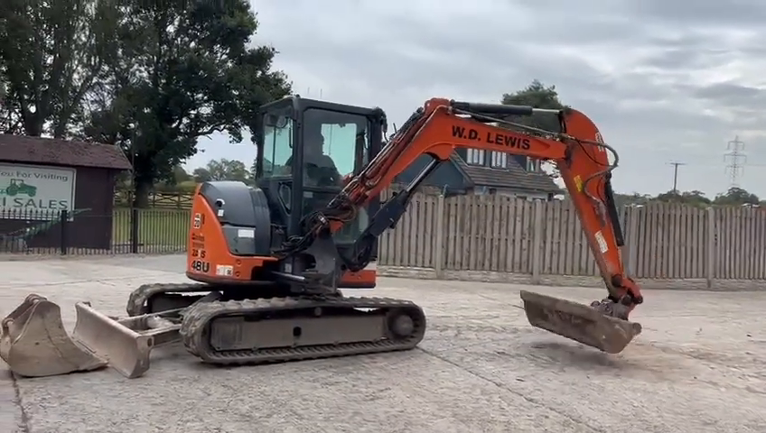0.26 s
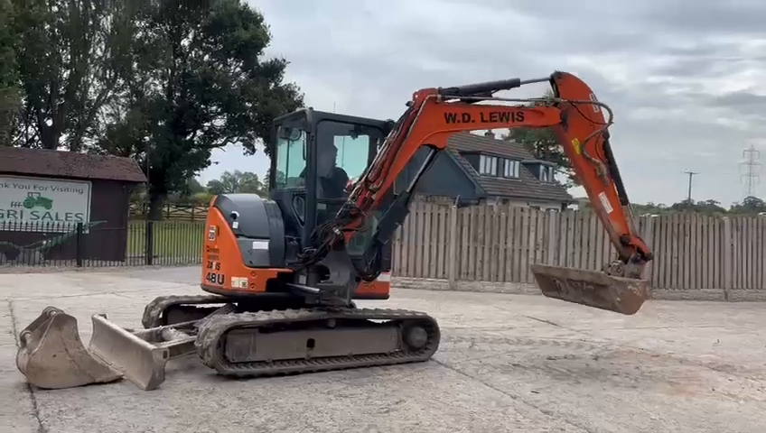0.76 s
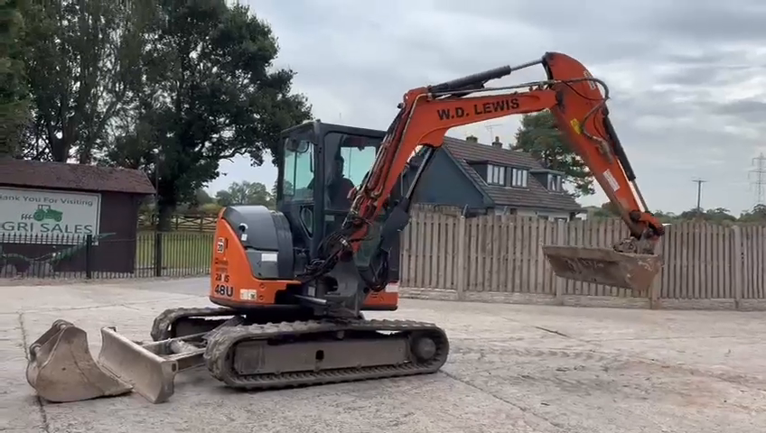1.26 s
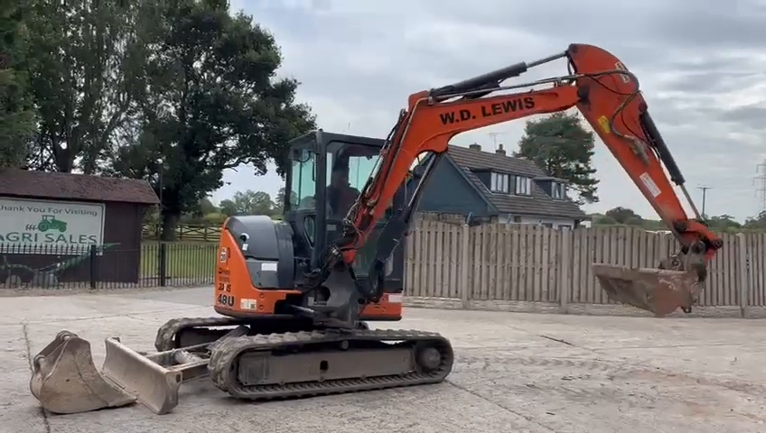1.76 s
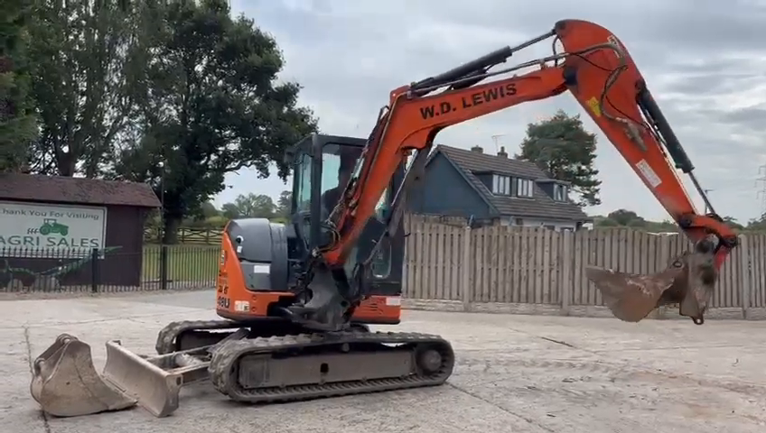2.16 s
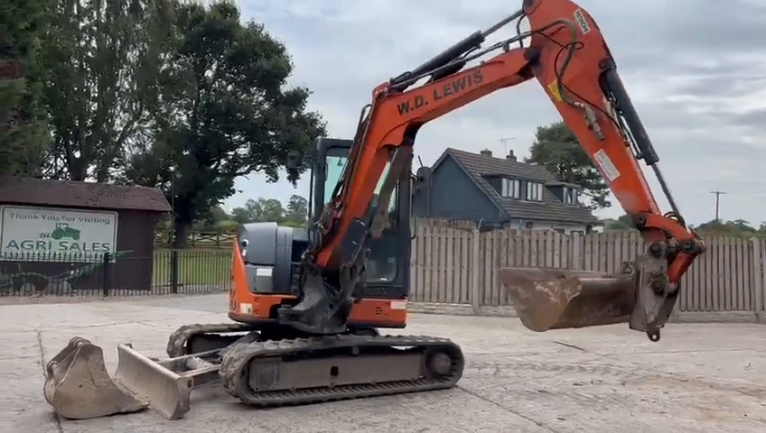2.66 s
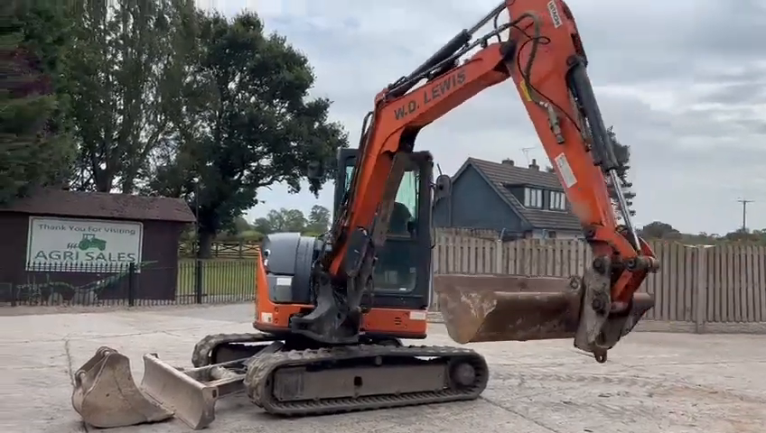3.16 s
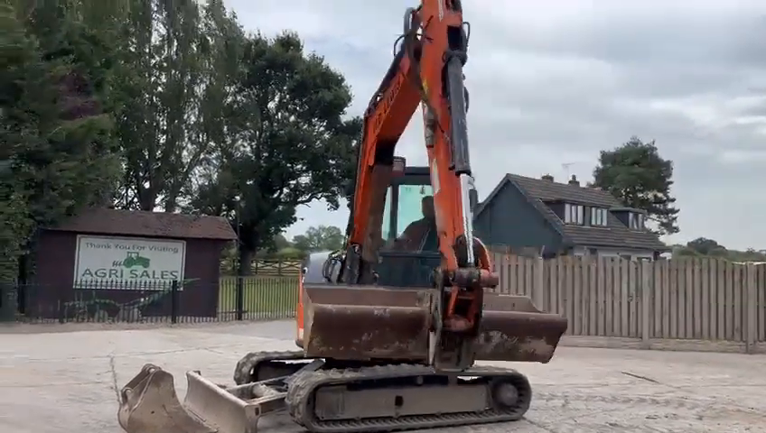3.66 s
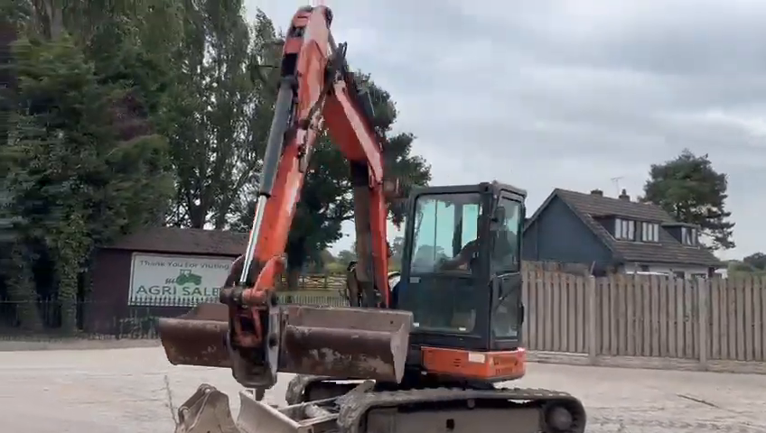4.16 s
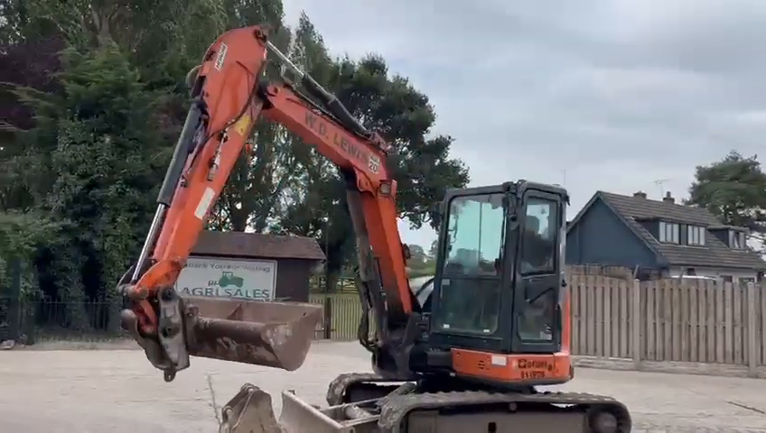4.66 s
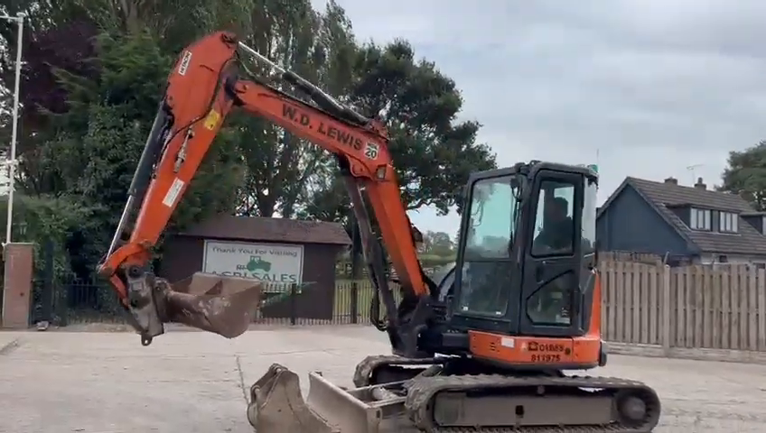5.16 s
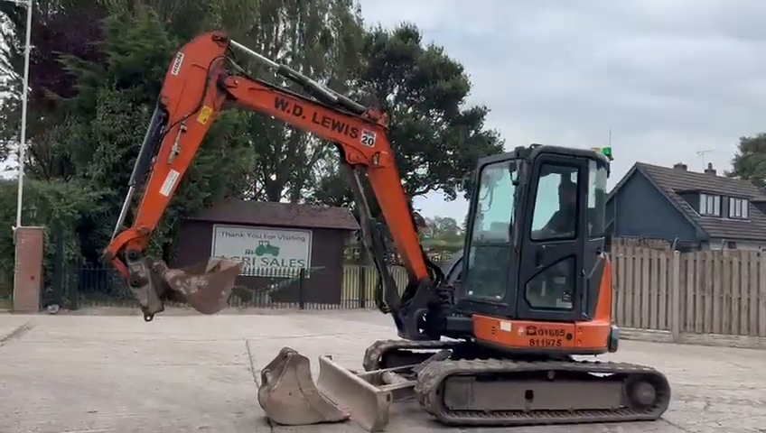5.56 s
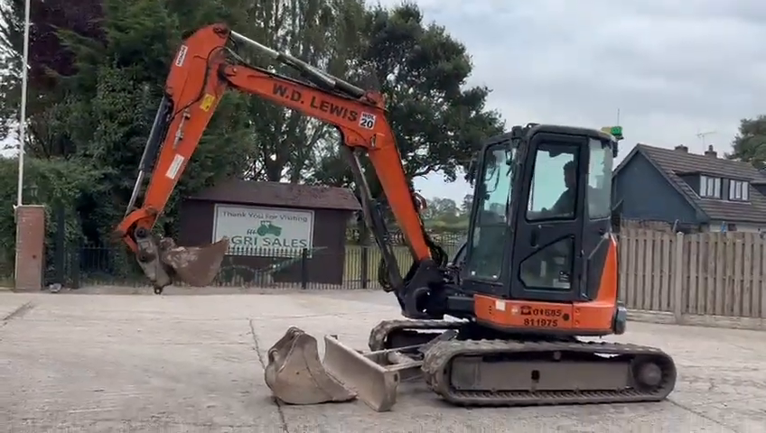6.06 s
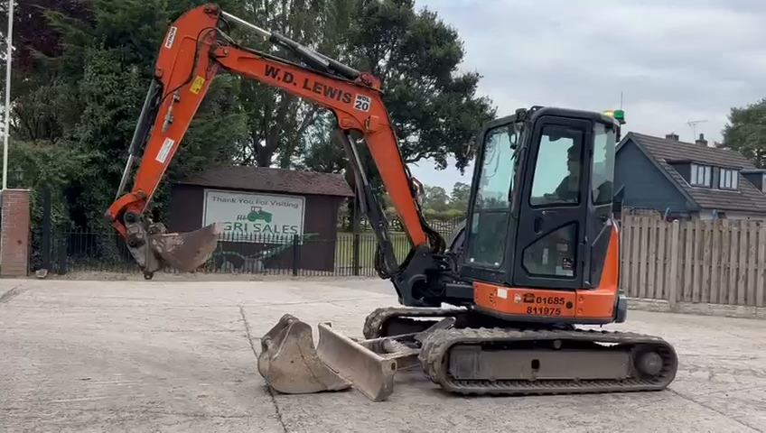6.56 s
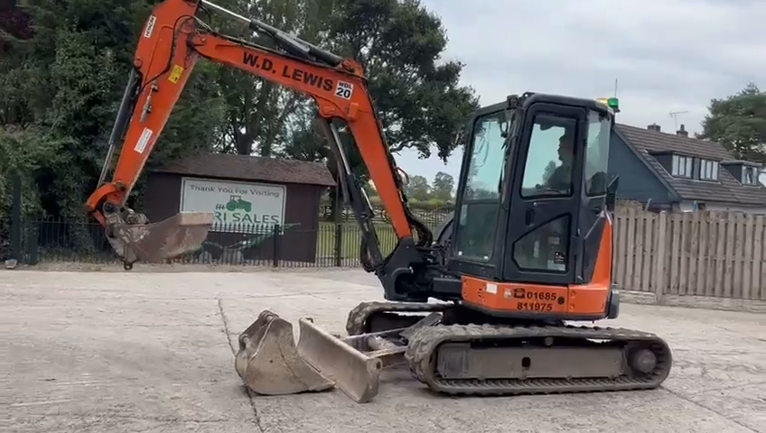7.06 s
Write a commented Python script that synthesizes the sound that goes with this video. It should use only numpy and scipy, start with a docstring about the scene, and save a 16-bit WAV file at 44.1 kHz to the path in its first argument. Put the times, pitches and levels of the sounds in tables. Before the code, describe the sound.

A small diesel digger drones steadily in a windy yard as its steel bucket clanks and scrapes, then hydraulics whine and wind buffets the microphone.

```python
"""A small four-cylinder diesel digger at work in a concrete yard, heard by a stereo microphone in the wind.
From the start the exhaust drones in shaft harmonics over pump and fan tones, and noise pulses with the firings.
The bucket knocks (ringing steel modes) and scrapes (gritty noise) as it leaves the ground, amid gusts of noise.
From 2.3 s the slew brings a gear whine, and bonnet resonances swell in turn. From 5.3 to 6.1 s the wind is strongest,
with falling eddies and low thumps; pump and gear whine surge briefly at 6.3 s, with a dull knock."""
import sys
import numpy as np
from scipy import signal
from scipy.fft import rfft, irfft, next_fast_len
from scipy.io import wavfile
from scipy.ndimage import uniform_filter1d, map_coordinates

SR = 44100
rng = np.random.default_rng(int(sys.argv[2]) if len(sys.argv) > 2 else 0)


def pcm_store(signal):
    """Save signal as 16-bit PCM."""
    levels = np.round(np.clip(np.atleast_2d(signal), -1, 1) * 32767)
    wavfile.write(sys.argv[1], SR, levels.astype(np.int16).T)


N = 322193

# shaft speed: (time [s], speed [rev/s])
SHAFT_SPEED = [(0, 31.57), (.8, 31.53), (1.25, 31.4), (1.7, 31.58), (2.52, 31.8), (3.1, 31.2),
               (3.36, 31.19), (3.75, 31.53), (4.5, 31.57), (5.1, 31.86), (6.16, 31.77), (6.55, 31.58),
               (7, 31.75), (7.31, 31.59)]
# exhaust drone: (time [s], firing tone level [dB], its octave level [dB])
EXHAUST = [(0, -22.5, -14.5), (.14, -28.5, -50), (.28, -30.5, -26), (.56, -21.5, -24), (1.3, -21.5, -22.5),
           (1.54, -24, -21.5), (1.7, -20, -24), (2.3, -20.5, -25.5), (2.42, -21, -39), (2.55, -24.5, -33),
           (2.7, -22, -28.5), (3.3, -20, -26.5), (3.9, -19, -28.5), (4.35, -19.5, -31.5),
           (5.05, -18.5, -26), (5.3, -22.5, -28), (5.6, -23.5, -22.5), (5.88, -25.5, -27.5),
           (6.01, -37, -27), (6.44, -43, -29.5), (6.6, -27.5, -26), (7.0, -22, -22), (7.31, -23, -25.5)]
# upper exhaust harmonics: (time [s], 3rd harmonic level [dB], 4th harmonic level [dB])
EXHAUST_UPPER = [(0, -47, -37.5), (1, -40.5, -46), (2.2, -41.5, -43), (2.7, -39, -47.5), (3.4, -43.5, -37),
                 (4.2, -43.5, -48.5), (5, -43.5, -51.5), (7.31, -47.5, -48)]
# shape of the exhaust pulse: (time [s], phase of 2nd [rad], of 3rd [rad], of 4th harmonic [rad])
PULSE_PHASE = [(0, 2.8, .3, 0), (2.6, 2.9, .4, -.5), (3.3, 2.9, 3, -2.7), (3.7, 2.9, 3, -2.4),
               (5.1, .6, 3.5, -2), (7.31, .8, 3.1, -4.5)]
# weaker shaft orders, the half ones from unequal cylinders: (multiple of shaft speed, level [dB])
WEAK_ORDERS = [(1.5, -55.5), (2.5, -43.5), (3, -56.5), (3.5, -44), (4.5, -52.5), (5.5, -49), (7, -47),
               (10, -56.5), (12, -54), (14, -54), (17.5, -58.5)]
# hydraulic effort, heard as the pump's tooth tone: (time [s], level [dB])
PUMP_EFFORT = [(0, -45), (.7, -39.5), (.82, -37), (1.08, -36), (1.15, -40), (1.22, -32), (1.4, -39.5),
               (1.54, -43), (1.62, -34.5), (1.74, -28), (1.8, -55), (2.02, -31), (2.1, -46), (2.13, -40),
               (2.15, -26), (2.2, -45), (2.3, -39.5), (2.52, -54), (2.82, -40.5), (3.08, -37), (3.18, -48),
               (3.3, -37), (4.2, -39), (4.4, -34), (5.18, -33.5), (5.35, -44.5), (5.65, -32), (5.9, -40.5),
               (6.02, -40.5), (6.27, -42), (6.297, -28.5), (6.33, -38), (6.44, -46), (6.6, -35.5),
               (7.31, -33.5)]
# pump overtones: (time [s], second level [dB], third level [dB], highest group level [dB])
PUMP_OVERTONES = [(0, -55, -64, -75), (1.75, -53, -60, -66), (2.25, -63, -49, -76),
                  (2.75, -66.5, -51.5, -70), (3.25, -52, -54, -69), (3.75, -56.5, -52.5, -68),
                  (4.25, -48.5, -53.5, -65), (4.75, -61.5, -44.5, -62), (5.25, -48.5, -49, -70.5),
                  (5.75, -52, -58, -66), (6.25, -56, -48.5, -71.5), (6.75, -60, -55, -67.5),
                  (7.31, -63, -47, -63.5)]
# highest pump overtones: (multiple of tooth tone, level over the group [dB])
PUMP_HIGHEST = [(4, 6), (8, 0), (9, 1)]
# gear whine, from the slew on: (time [s], level [dB])
GEAR_WHINE = [(2.3, -70), (2.55, -46.5), (2.8, -48), (3.0, -56), (3.36, -66), (3.5, -43.5), (3.9, -51.5),
              (4.3, -45.5), (5.3, -43.5), (6.1, -46.5), (6.27, -46), (6.298, -32), (6.33, -40.5),
              (7.31, -41)]
# fan tone; its grille turns away, then near: (time [s], level [dB])
FAN_LEVEL = [(.3, -37.5), (1.1, -50.5), (1.5, -45), (1.9, -47), (2.5, -42), (2.8, -44), (3.36, -59),
             (3.8, -57.5), (4.1, -43.5), (4.35, -50), (4.5, -40.5), (5.3, -34.5), (6.0, -38.5), (6.3, -38),
             (6.72, -33), (7.31, -30.5)]
# the engine bay swings right: (time [s], left over right [dB])
BEARING = [(0, 4.5), (3.7, 0), (4.3, 1), (6.2, -1), (6.6, -2.5), (7.31, -2)]
# casing noise: (time [s], roar level [dB], hiss level [dB])
CASING = [(0, -28, -24.5), (.16, -56, -36.5), (.4, -39, -43), (1.3, -34.5, -43), (1.55, -41, -44.5),
          (2.24, -39.5, -44.5), (2.5, -43.5, -46), (3.28, -43, -46.5), (4.62, -39.5, -44.5),
          (5.45, -41, -45), (6.1, -37, -43), (6.96, -37.5, -43.5), (7.31, -42, -43.5)]
# relative colour of the casing's roar and hiss: (frequency [Hz], density [dB per Hz])
ROAR_COLOUR = [(200, -34.5), (400, -4), (640, -2), (800, -4.5), (1000, 0), (1280, -10), (1600, -13.5),
               (2400, -60)]
HISS_COLOUR = [(900, -10), (1500, 6.5), (1900, 3), (2400, 1), (3400, -6), (4800, -17), (6400, -22.5),
               (8300, -35)]
# clatter of each firing in the cycle, before its share is applied: (hiss level [dB], roar level [dB])
CYLINDERS = [(-1, -1.5), (0, -1.5), (0, 0), (-0.5, 1)]
# bonnet resonances, each loudest as it faces the microphone: (frequency [Hz], width [Hz],
# level turned away [dB], level facing [dB], time facing [s], spread of that time [s])
PANELS = [(1042, 40, -52, -49.5, 4.75, 0.27), (1383, 44, -57, -47.5, 6.6, 0.78),
          (1870, 58, -58.5, -47.5, 5.21, 0.15), (1885, 69, -58, -50, 6.8, 0.73),
          (2436, 55, -59, -56, 5.5, 0.87), (4330, 300, -72, -63, 2.8, 2.1), (880, 30, -59, -49, 2.4, 0.67)]
# phase lead of the left channel in engine and panels: (frequency [Hz], lead [rad])
ENGINE_LEAD = [(60, -.08), (600, -.1), (860, 1.7), (1380, 1.3), (1980, 5.9), (2500, 2 * np.pi)]
# knocks of the bucket and its pins: (time [s], level [dB], hollow boost [dB], clang boost [dB])
KNOCKS = [(.0, -11.5, 2, -17), (0.017, -10.5, 1.5, -14), (0.033, -11.5, 5, -12), (.048, -14, 4, -15),
          (0.068, -7.5, 3, -38), (0.077, -7, 2.5, -26), (0.096, -7, 3.5, -25), (.108, -11.5, -9, -22),
          (.156, -12.5, 2.5, -20), (.178, -19.5, 11.5, -14), (.135, -22.5, 1, -7), (.21, -25, -5.5, -14),
          (0.242, -25.5, -5.5, -19), (.338, -16, 1, -10.5), (0.357, -15.5, -7, -8), (0.402, -21, -4.5, -22),
          (.417, -12.5, -9, -33), (0.429, -12, -11, -26), (.476, -14.5, 0.5, -27), (0.504, -23, -8, -29),
          (.534, -20.5, 2.5, -18), (0.715, -22, -11.5, -16), (1.201, -33, -4.5, -8), (1.23, -30.5, 18, -10),
          (1.4, -20, -2, -9), (1.884, -17, -15, -30), (1.934, -25, -13, -23), (2.141, -19.5, -7, -34.5),
          (3.152, -24, -0.5, -27), (6.286, -19, -14, -28.5)]
# steel modes; the lowest two are the hollow, those above 1 kHz the clang:
# (frequency [Hz], level [dB], 60 dB decay [s])
BUCKET_MODES = [(240.6, -6, 0.3), (271.8, -1, 0.12), (346.7, -9, 0.15), (396.4, -6, 0.094),
                (495.6, -14, 0.13), (568, -17.5, 0.12), (808, -24.5, 0.12), (1215, -3, .14), (1410, -6, .1),
                (1670, -8, .1), (1827, -13, .1), (2250, -10, .14), (2550, -13, .12), (3000, -12, .08),
                (3750, -19, .07), (4100, -21, .08), (4480, -22, .07), (5400, -25, .06), (6300, -28, .05)]
# gritty scrapes of steel: (time [s], level [dB])
SCRAPES = [(0, -16.5), (.015, -22.5), (0.038, -20), (.068, -28.5), (.1, -38), (.125, -31), (0.15, -26),
           (.225, -36), (.32, -36.5), (0.335, -21.5), (0.355, -23), (.382, -34), (0.415, -35), (0.478, -38),
           (0.584, -35.5), (.624, -38.5), (0.774, -34.5), (1.197, -30), (1.222, -38), (1.33, -33),
           (1.381, -30.5), (1.396, -39), (1.412, -37), (1.75, -41.5), (2.14, -38.5)]
# relative colour of the grit before the steel rings: (frequency [Hz], density [dB per Hz])
GRIT_COLOUR = [(250, -15.5), (600, 2.5), (820, 2), (1300, -2), (1700, -7), (2250, -7.5), (3000, -11.5),
               (4500, -17.5), (6300, -23.5), (8400, -31.5)]
# steady air on the microphone ports: (time [s], buffet level [dB], flutter level [dB])
BREEZE = [(.3, -30, -31), (1.5, -25.5, -35), (2.3, -35.5, -36.5), (2.7, -40.5, -41), (3.5, -33.5, -40),
          (4, -32.5, -39), (5, -34.5, -43), (5.8, -25.5, -34.5), (5.99, -27, -29.5), (6.02, -30.5, -34.5),
          (6.3, -36.5, -39), (7.3, -30.5, -36.5)]
# gusts: (time of peak [s], buffet level [dB], flutter level [dB])
GUSTS = [(.43, -24.5, -22.5), (.7, -23.5, -24), (.97, -26.5, -46), (1.24, -23, -34.5),
         (1.419, -35.5, -24.5), (1.881, -28, -32.5), (2.2, -23.5, -56.5), (2.59, -33.5, -48),
         (2.87, -24, -50), (3.099, -22.5, -40), (5.292, -19.5, -43), (5.57, -17.5, -32), (5.65, -20.5, -46),
         (5.78, -18, -29), (5.91, -16, -30.5), (6.34, -33, -33), (6.62, -40, -39), (6.77, -29.5, -34.5),
         (7.18, -24.5, -43.5)]
# relative colour of the buffet and the higher flutter: (frequency [Hz], density [dB per Hz])
BUFFET_COLOUR = [(15, -38.5), (30, 1), (50, 17.5), (85, 15.5), (130, 12), (200, -1), (400, -54.5)]
FLUTTER_COLOUR = [(90, -12.5), (160, 1), (240, -0.5), (330, -4.5), (500, -8.5), (800, -16.5), (1500, -67)]
# eddies that slap the ports: (time [s], level [dB], span of the pitch fall [Hz])
EDDIES = [(1.007, -15, 289), (3.954, -17, 466), (5.488, -22, 253), (5.554, -7, 638), (5.605, -24, 351),
          (5.665, -12.5, 191), (5.696, -13.5, 342), (5.745, -9, 249), (5.77, -10.5, 833),
          (5.785, -6.5, 385), (5.87, -29.5, 460), (5.898, -35, 347), (5.924, -22, 427), (5.953, -12, 445),
          (5.964, -17.5, 262), (6.025, -18, 260), (6.121, -18, 296), (6.439, -26.5, 400),
          (6.732, -17.5, 473)]
# low thumps of air on the ports: (time [s], level [dB], frequency [Hz], length [s])
THUMPS = [(5.612, -13, 76, 0.047), (5.648, -13.5, 78, 0.049), (5.69, -13.5, 85, 0.034),
          (5.742, -10.5, 87.3, 0.091), (5.87, -18.5, 83.4, 0.082), (5.962, -13, 105.7, 0.035),
          (5.986, -11, 118, 0.025), (6.039, -19.5, 126.5, 0.033)]
# left-right likeness of the noises at normal width: (frequency [Hz], likeness [0 to 1])
LIKENESS = [(30, 1), (70, 1), (260, 0.88), (550, 0.35), (1050, 0.38), (1550, .35), (2400, 0.52),
            (5000, 0.62), (9000, 0.4)]
# colour difference of the two ports: (frequency [Hz], left over right [dB])
PORT_TILT = [(100, -0.9), (300, -0.8), (660, -3), (1000, -0.5), (1500, -1.5), (3200, 2), (5000, 0),
             (8000, 0)]

PUMP_TEETH, WHINE_ORDER, FAN_HZ = 11, 18, 182.9
TICK_RISE_DB, TICK_SCATTER_DB = 1, 0.74  # climb between firings; random spread per firing
HISS_SHARE, PANEL_SHARE = .4, 2.6  # scaling of the hiss clatter in the hiss and in the panels
HOLLOW_TOP_HZ, CLANG_FOOT_HZ = 300, 1000
DETUNE = 0.011  # spread, as a fraction: load on the shell shifts its modes from knock to knock
FREE_S = 0.013  # time a knock rings before the steel touches again
THUD_DB, THUD_T60_S, THUD_HZ = -7, 0.068, 580  # dull contact noise: over the knock, decay, upper edge
SCRAPE_RISE_S, SCRAPE_T60_S = 0.0024, 0.17
CHIPS_PER_S, CHIP_DB, CHIP_S = 260, 3, .004  # stones that catch: rate, mean jump, decay time
GUST_RISE_DB_PER_S, GUST_FALL_DB_PER_S = 114, 171.5
EDDY_CYCLES = 4.41  # time scale of an eddy, in cycles of its pitch span
TOP_HZ = 8700  # band limit
HALVES = np.array([[.5], [-.5]])  # splits a left-right difference evenly


def engine(shaft, hiss_ticks, roar_ticks):
    """Places the tones by bearing and adds the casing; the long exhaust waves show the least direction."""
    side = curves(BEARING)[0] * HALVES
    drone = exhaust(shaft) * amp(.3 * side)
    hum = (fan() + pump(shaft) + gear_whine(shaft)) * amp(side)
    return drone + hum + casing(hiss_ticks, roar_ticks)


def exhaust(shaft):
    """Two firings a turn make a pulse of four harmonics, joined by weaker orders of the shaft."""
    firing_db, octave_db = curves(EXHAUST)
    third_db, fourth_db = curves(EXHAUST_UPPER)
    second, third, fourth = curves(PULSE_PHASE)
    drone = tone(2 * shaft, firing_db, waver_db=.6, slip=.04)
    drone += tone(4 * shaft + second, octave_db + .8 * wobble(5.2), waver_db=.7, slip=.06)
    drone += tone(6 * shaft + third, third_db, waver_db=2.5, slip=.1)
    drone += tone(8 * shaft + fourth, fourth_db, waver_db=1.5, slip=.12)
    for order, db in WEAK_ORDERS:
        start = rng.uniform(0, 2 * np.pi)
        drone += tone(order * shaft + start, db, waver_db=4.5, slip=.41)
    return drone


def pump(shaft):
    """Each passing gear tooth pushes the oil: a tooth tone set by the effort, with overtones."""
    tooth = PUMP_TEETH * shaft
    second_db, third_db, highest_db = curves(PUMP_OVERTONES)
    hum = tone(tooth, curves(PUMP_EFFORT)[0], waver_db=.9, slip=.08)
    hum += tone(2 * tooth, second_db, waver_db=2, slip=.13)
    hum += tone(3 * tooth, third_db, waver_db=1, slip=.29)
    for multiple, db in PUMP_HIGHEST:
        hum += tone(multiple * tooth, highest_db + db, waver_db=2.5, slip=.5)
    return hum


def gear_whine(shaft):
    """A gear tone locked to the shaft, unsteady in level and phase."""
    return tone(WHINE_ORDER * shaft, curves(GEAR_WHINE)[0] + 1.3 * wobble(5.7), waver_db=0, slip=.31)


def fan():
    """A blade tone at its own steady speed, free of the shaft."""
    phase = 2 * np.pi * FAN_HZ * np.arange(N) / SR
    return tone(phase, curves(FAN_LEVEL)[0] + 1.3 * wobble(4.5), waver_db=1.5, slip=.73)


def casing(hiss_ticks, roar_ticks):
    """The casing radiates a roar and a hiss that pulse with the firings and throb slowly."""
    roar_db, hiss_db = curves(CASING)
    throb = .3 * wobble(2.8) + wobble(6.6)
    roar = amp(roar_db + roar_ticks + .34 * throb) * rush(ROAR_COLOUR, patchy_db=2)
    hiss = amp(hiss_db + HISS_SHARE * hiss_ticks + .2 * throb) * rush(HISS_COLOUR, patchy_db=1.34)
    return roar + hiss


def panels(tick_db):
    """The firings ring the bonnet: noise in narrow resonances that swell as the body turns."""
    sound = 0
    for hz, width_hz, away_db, facing_db, facing_s, spread_s in PANELS:
        pair = rng.standard_normal(N) + .55 * rng.standard_normal((2, N))
        struck = pair * amp(PANEL_SHARE * tick_db)
        ring = filtered(struck, lambda f: resonance(f, hz, width_hz))
        facing = np.exp(-((np.arange(N) / SR - facing_s) / spread_s) ** 2 / 2)
        sound = sound + amp(away_db + (facing_db - away_db) * facing) * unit(ring)
    return sound


def shaft_angle():
    """Crank angle in radians, summed from the shaft speed."""
    return 2 * np.pi * np.cumsum(curves(SHAFT_SPEED)[0]) / SR


def ticks(shaft):
    """Clatter in dB for hiss and roar: a new level at each firing, then a slight climb to the next."""
    firings = shaft / np.pi + .6
    k = firings.astype(int)
    scatter = rng.standard_normal((2, k[-1] + 1))[:, k]
    size = np.transpose(CYLINDERS)[:, k % 4] + TICK_SCATTER_DB * scatter
    return uniform_filter1d(size + TICK_RISE_DB * (firings - k - .5), size=60)


def bucket():
    """Steel knocks a little to the right, the yard's answer 10 dB down, and the scrapes."""
    shell = knocks()
    return shell * amp([[-.6], [.6]]) + amp(-10) * yard(shell) + scrapes()


def knocks():
    """Each knock rings the shell's decaying modes at new strengths, then renewed contact mutes them."""
    shell, t = np.zeros(N + SR), np.arange(SR // 2) / SR
    hz, level, t60 = np.transpose(BUCKET_MODES)[:, :, None]
    chance = rng.standard_normal((len(KNOCKS), 2, len(BUCKET_MODES), 1))
    band = signal.butter(2, [200, THUD_HZ], 'band', fs=SR, output='sos')
    dull = unit(signal.sosfilt(band, rng.standard_normal((len(KNOCKS), len(t)))))
    muting = 22 * (1 - np.exp(-np.clip(t - FREE_S, 0, None) / .008))
    damped = muting * np.where(hz < CLANG_FOOT_HZ, 1, .45)  # contact mutes the low modes most
    for (s, db, hollow_db, clang_db), (luck, shift), thud in zip(KNOCKS, chance, dull):
        strength = level + hollow_db * (hz < HOLLOW_TOP_HZ) + clang_db * (hz > CLANG_FOOT_HZ) + 1.5 * luck
        modes = np.sin(2 * np.pi * hz * (1 + DETUNE * shift) * t)
        ring = np.sum(amp(strength - 60 * t / t60 - damped) * modes, axis=0)
        ring += amp(THUD_DB - 60 * t / THUD_T60_S) * thud
        onset = 1 - np.exp(-t / .0038)
        shell[round(s * SR):][:len(t)] += amp(db) * onset * ring
    return shell[:N]


def yard(shell):
    """The concrete answers with a half-second noise tail that loses treble on the way back."""
    t = np.arange(SR // 2) / SR
    tail = rng.standard_normal(len(t)) + .3 * rng.standard_normal((2, len(t)))
    lowpass = signal.butter(1, 1200, fs=SR, output='sos')
    tail = signal.sosfilt(lowpass, tail * amp(-60 * t / .5))
    return signal.fftconvolve(shell[None], tail / np.linalg.norm(tail[0]), axes=1)[:, :N]


def scrapes():
    """Stones catch at random and make grainy noise, which also excites the clang modes."""
    chips = (rng.random(N) < CHIPS_PER_S / SR) * CHIP_DB * rng.exponential(size=N)
    jumps_db = signal.lfilter([1], [1, -np.exp(-1 / (CHIP_S * SR))], chips)
    jumps_db = uniform_filter1d(np.minimum(jumps_db, 8), size=50)
    grains = amp(jumps_db + .6 * wobble(60)) * rush(GRIT_COLOUR, patchy_db=3)
    clangs = [hz for hz, _, _ in BUCKET_MODES if hz > CLANG_FOOT_HZ]
    grit = unit(filtered(grains, lambda f: 1 + 2.2 * sum(resonance(f, hz, 35) for hz in clangs)))
    return sum(burst(s, db, SCRAPE_RISE_S, SCRAPE_T60_S) for s, db in SCRAPES) * grit


def wind():
    """Moving air presses on the ports: lumpy noise, then sharp eddies and thumps."""
    air = buffeting()
    add_eddies(air)
    add_thumps(air)
    return air


def buffeting():
    """Low buffet and higher flutter noise, breeze and gusts summed as power."""
    buffet, flutter = amp(curves(BREEZE)) ** 2
    for s, buffet_db, flutter_db in GUSTS:
        late = np.arange(N) / SR - s
        swell = amp(np.where(late < 0, GUST_RISE_DB_PER_S * late, -GUST_FALL_DB_PER_S * late)) ** 2
        buffet = buffet + amp(2 * buffet_db) * swell
        flutter = flutter + amp(2 * flutter_db) * swell
    air = np.sqrt(buffet) * amp(.63 * wobble(19)) * rush(BUFFET_COLOUR, patchy_db=1.5, wide=1.7)
    air += np.sqrt(flutter) * amp(.41 * wobble(23)) * rush(FLUTTER_COLOUR, patchy_db=3, wide=.94)
    return air


def add_eddies(air):
    """Each eddy is a short swirl whose pitch falls towards 95 Hz as it widens in passing."""
    t = np.arange(SR // 8) / SR
    for s, db, span_hz in EDDIES:
        turn, left, right = rng.standard_normal(3)
        u = t * span_hz / EDDY_CYCLES
        pitch = 95 + span_hz * np.exp(-1.3 * u)
        offset = turn + .088 * np.array([[left], [right]])
        swirl = np.sin(2 * np.pi * np.cumsum(pitch) / SR + offset)
        at = round(s * SR)
        air[:, at:at + len(t)] += amp(db) * u * np.exp(-u ** 2 / 2) * swirl


def add_thumps(air):
    """Each thump is a low sine under a half-sine swell, alike on both ports."""
    t = np.arange(SR // 8) / SR
    for s, db, hz, length in THUMPS:
        turn = rng.standard_normal()
        swell = np.sin(np.pi * np.minimum(t / length, 1))
        at = round(s * SR)
        air[:, at:at + len(t)] += amp(db) * swell * np.sin(2 * np.pi * hz * t + turn)


def tone(phase, db, waver_db, slip):
    """A sine of rms level db, unsteady in size and phase."""
    return np.sqrt(2) * amp(db + waver_db * wobble(14)) * np.cos(phase + slip * wobble(18))


def rush(spectrum, patchy_db, wide=1):
    """Stereo noise of rms 1, with patches of random gain in time and pitch."""
    z = signal.stft(rng.standard_normal((2, N)), nperseg=512)[2]
    field = uniform_filter1d(rng.standard_normal(z.shape[1:]), 5, 0)
    field = uniform_filter1d(field, 12, 1)
    pair = signal.istft(z * amp(patchy_db * unit(field)), nperseg=512)[1][:, :N]

    def colour(hz):
        turn = wide * np.arccos(np.clip(along(LIKENESS, hz), -1, 1)) / 2
        return amp(along(spectrum, hz)) * [np.cos(turn), np.sin(turn)]

    mid, side = filtered(pair, colour)
    return unit(np.array([mid + side, mid - side]))


def burst(s, db, rise, t60):
    """An envelope that rises at s and dies away."""
    t = np.clip(np.arange(N) / SR - s, 0, None)
    return amp(db - 60 * t / t60) * (1 - np.exp(-t / rise))


def resonance(f, hz, width_hz):
    """Complex response of one mode, 1 at its centre."""
    return 1j * f * width_hz / (hz * hz - f * f + 1j * f * width_hz)


def filtered(x, response):
    """x shaped by a complex response of frequency."""
    m = next_fast_len(N + SR // 2)
    return irfft(rfft(x, m) * response(np.fft.rfftfreq(m, 1 / SR)), m)[..., :N]


def wobble(rate):
    """A smooth random curve, rate knots a second (at most 60)."""
    return map_coordinates(rng.standard_normal(int(N * 60 / SR) + 4), [np.arange(N) * rate / SR])


def curves(rows):
    """One value per sample for each column after the time."""
    s, *cols = np.transpose(rows)
    return [np.interp(np.arange(N) / SR, s, c) for c in cols]


def along(points, hz):
    """Values read from (frequency [Hz], value) points on a log axis."""
    f, v = np.transpose(points)
    return np.interp(np.log(hz + 1), np.log(f + 1), v)


def amp(db):
    """Gain of a level in dB."""
    return 10 ** (np.asarray(db) / 20)


def unit(x):
    """x at rms 1."""
    return x / np.sqrt(np.mean(x ** 2) + 1e-20)


def scene():
    """Mixes digger, bucket and wind; the engine's middle tones lead in phase on the left."""
    shaft = shaft_angle()
    hiss_ticks, roar_ticks = ticks(shaft)
    machine = engine(shaft, hiss_ticks, roar_ticks) + panels(hiss_ticks)
    machine = filtered(machine, lambda hz: np.exp(1j * HALVES * along(ENGINE_LEAD, hz)))
    return machine + bucket() + wind()


def record(dry):
    """Rounds the loudest peaks, colours the two ports and cuts steeply above the band limit."""
    rounded = dry / (1 + np.abs(dry / .95) ** 6) ** (1 / 6)

    def ports(hz):
        return amp(HALVES * along(PORT_TILT, hz)) / np.sqrt(1 + (hz / TOP_HZ) ** 60)

    return filtered(rounded, ports)


dry = scene()
out = record(dry)
pcm_store(out)
```